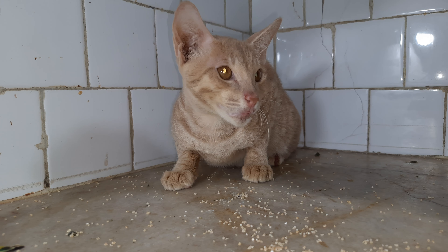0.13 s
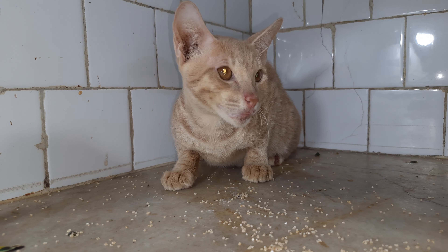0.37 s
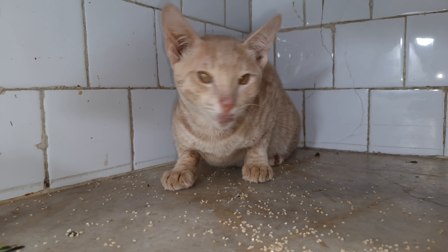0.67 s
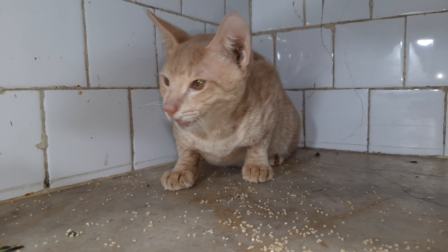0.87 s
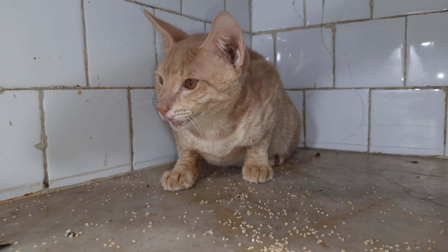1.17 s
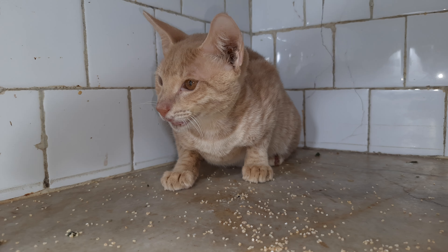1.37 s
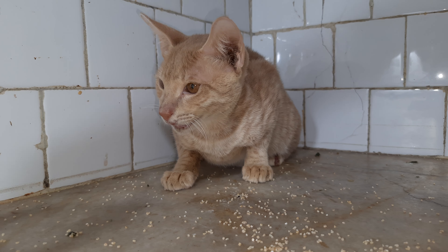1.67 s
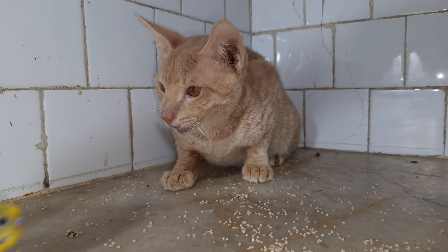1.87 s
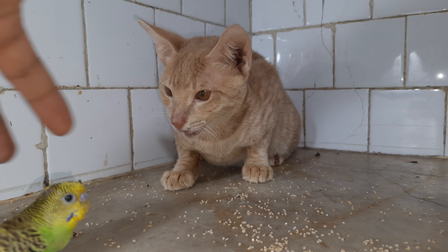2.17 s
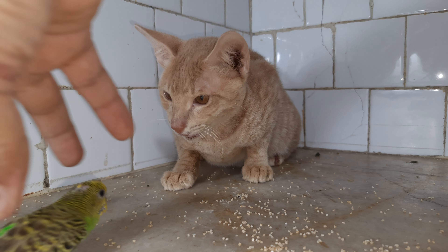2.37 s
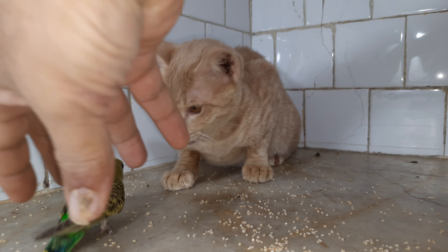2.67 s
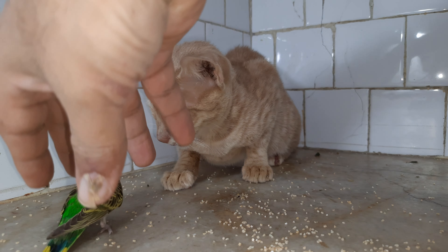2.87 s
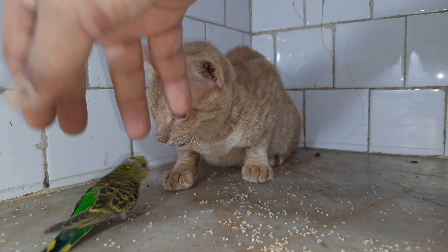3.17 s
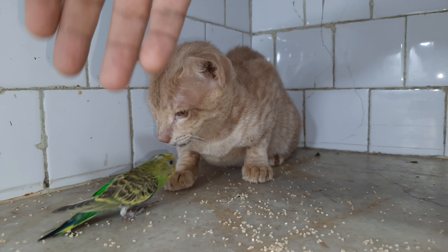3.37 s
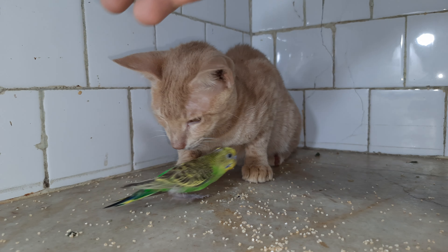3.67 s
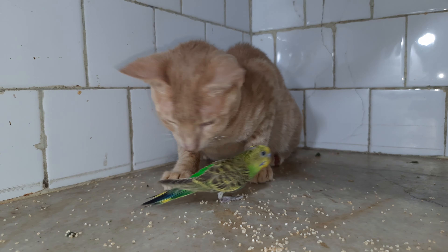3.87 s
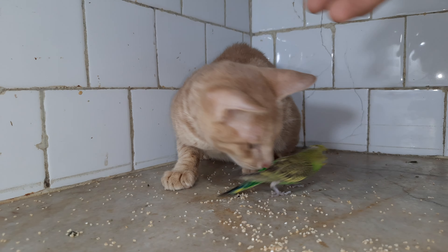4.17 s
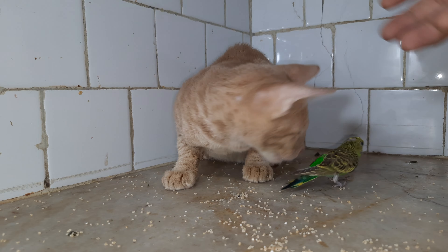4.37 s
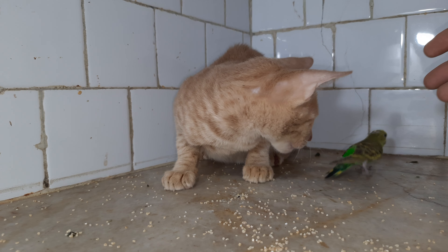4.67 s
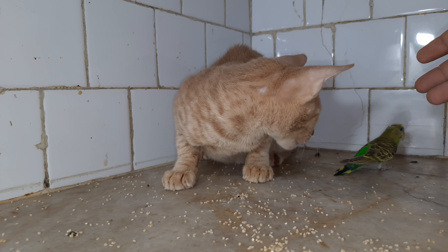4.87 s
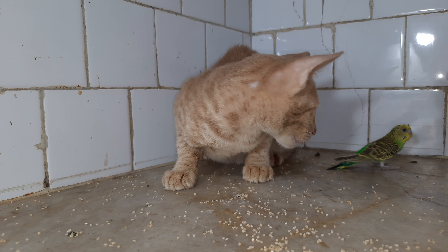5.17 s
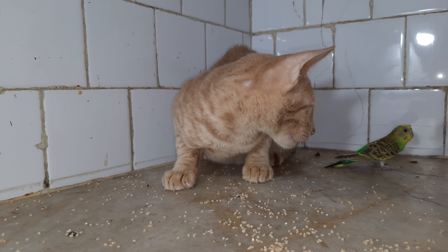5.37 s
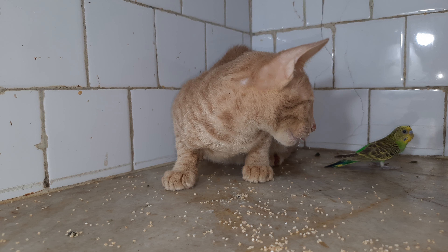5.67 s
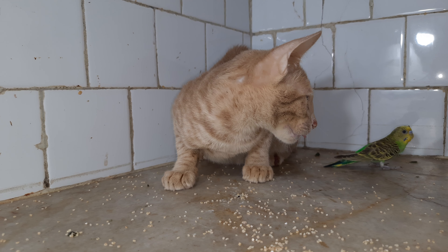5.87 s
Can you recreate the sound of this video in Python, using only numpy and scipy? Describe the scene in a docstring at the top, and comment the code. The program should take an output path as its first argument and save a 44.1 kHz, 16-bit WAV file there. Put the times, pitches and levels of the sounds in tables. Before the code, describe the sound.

Quiet tiled corner: brief feathery swishes, buffeting puffs of air and hard little knocks, then a pause and three late taps over low rumble.

```python
"""Handling close by in a tiled corner

Handling strokes and knocks close to two microphone ports: shaped noise makes swishes and rushes of air, short
cracks over ringing thuds make the knocks, and fluttering puffs of draught buffet the left port. Behind them the
room rumbles in its low modes, a far insect sings in pulses of banded noise, and a faint rustle, house noise and
a thin hiss never stop."""
import sys
import numpy as np
from scipy import signal
from scipy.fft import rfft, irfft, next_fast_len
from scipy.io import wavfile
from scipy.ndimage import uniform_filter1d, map_coordinates

SR = 44100
rng = np.random.default_rng(int(sys.argv[2]) if len(sys.argv) > 2 else 0)


def unload_wav(signal):
    """Save mono or channel-first audio to the path in sys.argv[1] as 16-bit WAV at rate SR, clipped to [-1, 1]."""
    wavfile.write(
        sys.argv[1],
        SR,
        np.round(np.clip(np.atleast_2d(signal).T, -1, 1) * 32767).astype(np.int16),
    )


N = 265349  # length [samples]

# Likeness of the two ports: (frequency [Hz], correlation [-1 to 1])
LIKENESS = [(60, 0.88), (290, 0.83), (640, 0.13), (1400, -0.17), (7000, 0.00081)]
# Decay time of the tiled walls: (frequency [Hz], t60 [s])
TILE_DECAY = [(200, 0.94), (700, 0.42), (1800, 0.51), (5000, 0.39), (13000, 0.33)]

# Hiss of the microphones: (frequency [Hz], relative gain [dB])
HISS_SPECTRUM = [(4410, -41), (7500, -6), (12500, -7), (16000, -7)]
# Far house noise: (frequency [Hz], relative gain [dB])
MURMUR_SPECTRUM = [(100, -5.5), (170, -3.5), (205, 0.5), (472, -13.5), (672, -23), (1200, -53),
                   (2640, -120)]
# Low rumble of the room: (time [s], upper modes level [dB], lowest modes level [dB])
RUMBLE_LEVELS = [(0, -52, -52), (.25, -59, -62.5), (.62, -57, -51.5), (.98, -47.5, -47.5), (1.29, -62, -73),
                 (1.46, -71, -47.5), (1.6, -68, -61), (1.68, -44, -53), (2.1, -42, -36.5),
                 (2.55, -46, -48.5), (3.0, -49.5, -52), (3.24, -44, -41), (3.32, -34, -46),
                 (3.55, -43, -49.5), (4.1, -49.5, -48), (4.3, -47.5, -51.5), (4.54, -47, -40),
                 (4.74, -52.5, -51.5), (5.04, -44, -41), (5.35, -48.5, -56.5), (5.8, -52.5, -57.5),
                 (5.93, -67.5, -62), (6.02, -54, -56)]
# Lowest room modes: (frequency [Hz], width [Hz], relative level [dB])
LOWEST_MODES = [(66.6, 8.13, -4), (81.2, 6.65, -2)]
# Upper room modes: (frequency [Hz], width [Hz], relative level [dB])
UPPER_ROOM_MODES = [(103, 4, 0), (126, 12, -11), (163, 6, -12)]

# Insect song, middle of its swells: (time [s], level [dB])
INSECT_LEVELS = [(0, -67.5), (2.4, -70), (3, -72.5), (3.6, -66), (5, -65.5), (6.02, -68)]
# Insect swells: (time [s], swells so far [count])
INSECT_SWELLS = [(-.045, -1), (1.4, 10), (3.62, 27), (6.037, 46)]
# Insect song: (frequency [Hz], relative gain [dB])
INSECT_SPECTRUM = [(4500, -120), (5600, -31), (6000, -17.5), (6250, -11.5), (6650, -9.5), (6850, -23),
                   (7100, -37), (8000, -120)]

# Faint stirring between strokes: (time [s], treble level [dB], middle level [dB], left over right [dB])
STIRRING_LEVELS = [(0, -81, -70.5, 7), (.22, -86, -74.5, 7), (.58, -77.5, -71.5, 12), (.67, -62.5, -87, 8),
                   (1.05, -53.5, -53.5, 1), (1.32, -59.5, -68, 5), (2.35, -51.5, -51.5, 3),
                   (2.75, -53, -46.5, 2), (3.05, -64.5, -59, 1.5), (3.4, -58.5, -45, 1), (3.7, -65, -54, 2),
                   (4.45, -63, -56, 1), (4.7, -68, -64, 2.1), (4.98, -63, -55.5, 2.1),
                   (5.2, -59.5, -42.5, 0.5), (6.02, -73, -68.5, 3)]
# Faint rustle: (frequency [Hz], relative gain [dB])
RUSTLE_SPECTRUM = [(880, -13.5), (1500, -7), (2400, -5), (3600, -10), (5000, -7.5), (8000, -10),
                   (10000, -13), (12500, -8), (16000, -12)]
# Treble pulses of the rustle: (time [s], pulses so far [count])
RUSTLE_PULSES = [(3.056, 0), (3.756, 13), (4.265, 22), (5.024, 35), (5.486, 43), (5.918, 50), (6.04, 52)]

# Bumps against something hollow: (time [s], peak [dB])
HOLLOW_BUMPS = [(2.606, -35.5), (2.633, -29), (2.664, -33.5), (2.698, -34.5), (2.753, -41.5)]
# Modes of the hollow thing: (frequency [Hz], mean relative level [dB], t60 [s])
HOLLOW_MODES = [(373.4, 2.5, 0.13), (434, 3, 0.19)]
# One touch on a bit of wire: (time [s], peak before panning [dB])
WIRE_TOUCH = (0.8268, -31)
# Modes of the wire: (frequency [Hz], mean relative level [dB], t60 [s])
WIRE_MODES = [(11770, 0, .09), (13000, -2, .035), (14900, -2, .025)]

# Puffs of draught: (start [s], relative level [dB], flutter [Hz], rise to the peak [s])
DRAUGHT_PUFFS = [(0.801, -27, 117, 0.0046), (0.816, -29, 54, 0.011), (0.957, -30, 288, 0.0096),
                 (1.837, -14.5, 116.3, 0.043), (1.858, -20, 92, 0.012), (1.872, -23, 414, 0.0016),
                 (1.876, -9, 228.6, 0.0089), (1.89, -13.5, 112, 0.0038), (1.917, -21, 281, 0.0098),
                 (1.995, -18.5, 95, 0.016), (2.059, -25, 86, 0.019), (2.195, -19, 220, 0.017),
                 (2.204, -20, 450, 0.0021), (2.225, -12.5, 374, 0.0014), (2.229, -9, 108, 0.0046),
                 (2.254, -16, 85, 0.02), (2.281, -12, 218.5, 0.011), (2.287, -17, 442, 0.0024),
                 (2.305, -15.5, 204, 0.00615), (2.324, -29, 70.7, 0.017), (2.442, -30.5, 132, 0.012),
                 (3.247, -31, 108, 0.0086), (5.01, -28.5, 120, 0.0075)]
# Rush of air: (frequency [Hz], relative gain [dB])
RUSH_SPECTRUM = [(40, -15.5), (110, 3), (180, 0.5), (424, -5.5), (659, -8), (1590, -20.5), (2230, -17.5),
                 (4000, -29.5), (5200, -27.5), (8800, -120)]

# Knocks, before their short delay: (time [s], relative level [dB], left over right [dB],
# relative thud level [dB], relative level of the walls [dB], tilt towards the treble [dB per octave])
KNOCK_LIST = [(0.6746, -30.5, 19.5, -11.5, -3, 0.5), (0.7721, -33, 7.5, -9, 7, -0.5),
              (0.817, -20.5, 28, -15, -11, 2.5), (0.932, -24, 9.5, -7, 4.5, -3.5),
              (0.9523, -25, -2, -3.5, -5.5, -7), (1.0107, -25, 6, -15, -16, 0),
              (1.6718, -35.5, 7, -8.5, 8.5, 1), (1.707, -27, 20, -25, 3, -5.5),
              (1.8304, -33.5, 3.5, 5.5, -1.5, 20), (1.9715, -26, 4, -13, 6, 3),
              (2.049, -28, 2, 2.5, 8.5, -13), (2.0839, -6, 6.5, -9.5, -0.5, 0.5),
              (2.1052, -17, -7, -1.5, 1.5, -3), (2.2626, -21.5, 17.5, -28, -18, 1.8),
              (2.593, -27.5, 16, -13, 3.5, -7.5), (3.259, -12.5, 1, -10.5, -2, 2.5),
              (5.02, -21.5, -3, -14, 2, 5), (5.0934, -13.5, 4, -10, -5, 0.5),
              (5.1554, -23.5, 3, -9, -26, 12)]
# Modes that a knock sets ringing: (frequency [Hz], mean relative level [dB], t60 [s])
KNOCK_MODES = [(414, 1.5, 0.046), (554.8, 1.5, 0.057)]
# Crack of a knock, before the tilt: (frequency [Hz], relative gain [dB])
CRACK_SPECTRUM = [(590, -31), (1000, -10), (2070, -0.5), (3010, -9), (5540, -5.5), (9620, -17), (14200, -9),
                  (16500, -54)]
# Thud of a knock: (frequency [Hz], relative gain [dB])
THUD_SPECTRUM = [(80, -41), (230, -4), (420, -4.5), (540, -2), (680, -8.5), (1200, -10.5), (2500, -22.5)]

# Handling strokes: (start [s], rise [s], hold [s], swish level [dB], rush of air level [dB],
# left over right in the swish [dB], sheen over the swish [dB])
HANDLING_STROKES = [(0.67, .003, 0.061, -51.5, -50.5, 13.5, 7), (0.733, 0.023, 0.0074, -45, -55, 9, 7),
                    (0.81, 0.01, 0.018, -40, -38, 1, 2.5), (0.916, 0.016, 0.048, -36.5, -39.5, 4.5, -3),
                    (1.026, 0.013, 0.0068, -49, -58, 3.5, 5.5), (1.176, 0.021, 0.014, -55.5, -58, 8, -5.5),
                    (1.386, 0.082, 0.038, -63.5, -77, 3, 13), (1.583, 0.038, 0.048, -53, -53, 2, 0),
                    (1.665, 0.0088, 0.0021, -46, -37, 4, 15), (1.704, 0.012, 0.0078, -41.5, -40.5, 2.5, 4),
                    (1.818, 0.017, 0.083, -49, -47, 0.5, 10.5), (1.849, 0.032, 0.049, -35, -34, 2.5, -6.5),
                    (1.952, 0.019, .01, -36, -32.5, 3, -11), (2.045, 0.004, 0.11, -42, -34, 7, -3),
                    (2.078, 0.014, 0.018, -33, -40, 18, -17), (2.165, 0.03, .03, -52, -42, 3, .3),
                    (2.224, 0.0073, 0.011, -43.5, -49, 4, 2.5), (2.258, 0.0097, 0.01, -40.5, -57, 1, -2.5),
                    (2.399, 0.017, 0.016, -50, -55, 3, -3.5), (2.566, 0.025, 0.0074, -39.5, -39.5, 1, -19),
                    (2.701, 0.027, 0.031, -46.5, -54, 6, -31), (2.821, 0.029, 0.05, -44.5, -70, 2.5, -4),
                    (3.25, 0.0073, 0.012, -31, -47, 1, -23), (4.316, 0.1, 0.015, -44, -52.5, 1.5, -6),
                    (5.016, 0.0061, 0.0066, -38.5, -50, 7, -4.5),
                    (5.09, 0.0079, 0.0034, -27, -40, 1, -10.5), (5.143, 0.015, .01, -42.5, -62, 2, -2)]
# Swish of a stroke: (frequency [Hz], relative gain [dB])
SWISH_SPECTRUM = [(880, -22), (1500, -5), (2340, -4), (3880, -7), (7320, -7.5), (12000, -7), (15100, -6),
                  (16000, -13)]

SWISH_TOP_HZ, TOP_HZ = 15900, 16974  # upper edge of hiss, rustle, swish and walls; of everything
PULSE_DB, PULSE_SHARP, PULSE_HZ = 2, 14, 5060  # mean peak over the rustle; narrowness; lower edge
PORT_LAG = 18  # delay of the shared part of a crack at the right port [samples]
KNOCK_DELAY_S = .0012  # short delay of every knock
SWISH_FALL_DB_PER_S, RUSH_FALL_DB_PER_S = 269, 153  # after the hold
SHEEN_HZ, SWISH_WALLS_DB = 4600, -9  # where a stroke's sheen begins; the walls' answer to the swish


def amp(db):
    """dB to gain."""
    return 10 ** (np.asarray(db) / 20)


def unit(x):
    """Scales to rms 1."""
    return x / np.sqrt(np.mean(x ** 2) + 1e-20)


def along(points, hz):
    """Reads (frequency, value) points on a log frequency axis."""
    f, v = np.transpose(points)
    return np.interp(np.log(hz + 1), np.log(f + 1), v)


def curves(rows):
    """Draws one value per sample for each column after the time."""
    s, *cols = np.transpose(rows)
    return [np.interp(np.arange(N) / SR, s, c) for c in cols]


def wobble(rate):
    """A smooth random curve with rate knots a second."""
    knots = rng.standard_normal(int(N * rate / SR) + 4)
    return map_coordinates(knots, [np.arange(N) * rate / SR])


def noise_pair(length=N):
    """Two unrelated white noises."""
    return rng.standard_normal((2, length))


def filtered(x, response):
    """Multiplies the spectrum of x by a response of frequency."""
    n = x.shape[-1]
    m = next_fast_len(n + 8192)
    return irfft(rfft(x, m) * response(np.fft.rfftfreq(m, 1 / SR)), m)[..., :n]


def colour(spectrum):
    """Gain of a spectrum table as a function of frequency."""
    return lambda hz: amp(along(spectrum, hz))


def capped(gain):
    """The same gain with nothing above the top of the swish."""
    return lambda hz: gain(hz) * (hz < SWISH_TOP_HZ)


def stereo(pair, gain):
    """Mixes two unrelated signals to the likeness of the two ports, coloured, rms 1."""
    def mid_side(hz):
        turn = np.arccos(np.clip(along(LIKENESS, hz), -1, 1)) / 2
        return gain(hz) * np.array([np.cos(turn), np.sin(turn)])

    mid, side = filtered(pair, mid_side)
    return unit(np.array([mid + side, mid - side]))


def patchy(pair, depth_db):
    """Noise of uneven colour: random gain in patches some 350 Hz by 25 ms."""
    z = signal.stft(pair, nperseg=512)[2]
    field = rng.standard_normal(z.shape[1:])
    for axis in (0, 1):
        field = uniform_filter1d(field, size=4, axis=axis)
    return signal.istft(z * amp(depth_db * unit(field)), nperseg=512)[1][:, :pair.shape[1]]


def pan(db):
    """Left and right gains for a level difference."""
    return amp(np.array([db / 2, -db / 2]))


def add(track, s, sound):
    """Mixes a sound in at a time."""
    track[:, round(s * SR):][:, :sound.shape[-1]] += sound


def ring(modes, peak_db):
    """Modes die away exponentially, at new strengths and phases for each blow."""
    t = np.arange(SR // 2) / SR
    x = np.zeros(len(t))
    for hz, db, t60 in modes:
        decay = amp(db + rng.normal(0, 2) - 60 * t / t60)
        x += decay * np.sin(2 * np.pi * (hz * t + rng.random()))
    x = x * (1 - np.exp(-t / 0.00044))  # soft onset
    return amp(peak_db) * x / np.abs(x).max()


def tail(gain):
    """A fresh answer of the tiled walls: noise in which each frequency dies at its own speed."""
    hz, t, z = signal.stft(patchy(noise_pair(SR), depth_db=2.0), SR, nperseg=256)
    decay = amp(-60 * t / along(TILE_DECAY, hz)[:, None])
    x = stereo(signal.istft(z * decay, SR, nperseg=256)[1], capped(gain))
    build_up = 1 - np.exp(-np.arange(x.shape[1]) / SR / 0.0072)
    return x * build_up / np.linalg.norm(x[0])


def strokes(levels_db, sides_db, fall_db_per_s):
    """Left and right gain of all strokes: each swells, holds and dies away; their powers add."""
    t, power = np.arange(N) / SR, np.zeros((2, N))
    for (s, rise, hold, *_), db, side_db in zip(HANDLING_STROKES, levels_db, sides_db):
        swell = np.clip((t - s) / rise, 0, 1) ** 2
        fall_db = fall_db_per_s * np.maximum(t - s - rise - hold, 0)
        power += (pan(side_db)[:, None] * swell * amp(db - fall_db)) ** 2
    return np.sqrt(power)


def hiss():
    """The microphones' own hiss: thin, steady noise in the treble."""
    return amp(-78) * stereo(noise_pair(), capped(colour(HISS_SPECTRUM)))


def house_murmur():
    """Far house noise: low coloured noise at a slowly wavering level."""
    return amp(-64.5 + 0.9 * wobble(2.57)) * stereo(noise_pair(), colour(MURMUR_SPECTRUM))


def mode_rumble(modes):
    """Room modes hum, each wandering in pitch on the scale of its width, over low noise through the same modes."""
    def response(f):
        peaks = sum((-1) ** k * amp(db) * 1j * f * width / (centre * centre - f * f + 1j * f * width)
                    for k, (centre, width, db) in enumerate(modes))
        return peaks * f ** 4 / (f ** 4 + 52 ** 4) / (1 + (f / 220) ** 4)

    noise = stereo(noise_pair(), response)
    hum = np.zeros(N)
    for centre, width, db in modes:
        level = amp(db + 2.9 * wobble(7)) * np.sqrt(width)
        cycles = np.cumsum(centre + width * wobble(6)) / SR + rng.random()
        hum += level * np.sin(2 * np.pi * cycles)
    return unit(unit(hum) + .8 * noise)


def room_rumble():
    """The upper and the lowest room modes follow separate level curves."""
    upper_db, lowest_db = curves(RUMBLE_LEVELS)
    return amp(upper_db) * mode_rumble(UPPER_ROOM_MODES) + amp(lowest_db) * mode_rumble(LOWEST_MODES)


def insect():
    """Far song: a narrow band of noise that swells in a nearly even beat."""
    beat = np.cos(2 * np.pi * curves(INSECT_SWELLS)[0])
    return amp(curves(INSECT_LEVELS)[0] + 4.4 * beat) * stereo(noise_pair(), colour(INSECT_SPECTRUM))


def stirring():
    """A faint smooth rustle; in the later part its treble pulses evenly, some 17 times a second."""
    stir_db, _, side_db = curves(STIRRING_LEVELS)
    count, = curves(RUSTLE_PULSES)
    shape = np.abs(np.cos(np.pi * count)) ** PULSE_SHARP
    pulses = (count > 0) * amp(PULSE_DB + 1.1 * wobble(10)) * shape
    gain = capped(colour(RUSTLE_SPECTRUM))
    rustle = stereo(patchy(noise_pair(), depth_db=3.5), gain)
    treble = filtered(stereo(noise_pair(), gain), lambda hz: hz ** 4 / (hz ** 4 + PULSE_HZ ** 4))
    return amp(stir_db + 0.69 * wobble(15.0)) * pan(side_db) * (rustle + pulses * treble)


def hollow_bumps():
    """Bumps set two low modes of something hollow ringing, alike at both ports."""
    out = np.zeros((2, N + SR))
    for s, db in HOLLOW_BUMPS:
        add(out, s, ring(HOLLOW_MODES, db)[None])
    return out[:, :N]


def wire_tink():
    """A bit of wire is touched and rings high, far to the left."""
    out = np.zeros((2, N + SR))
    s, db = WIRE_TOUCH
    add(out, s, ring(WIRE_MODES, db) * pan(31)[:, None])
    return out[:, :N]


def draught():
    """Each puff sets the air in the left port fluttering amid turbulence; the right port hears little of it."""
    out, t = np.zeros((2, N + SR)), np.arange(SR // 4) / SR
    for s, db, hz, rise in DRAUGHT_PUFFS:
        u = t / rise
        flutter = np.sin(2 * np.pi * hz * t)
        eddies = unit(filtered(rng.standard_normal(len(t)), lambda f: 1 / (1 + (f / 380) ** 3)))
        turbulence = 0.4 * eddies * u * np.exp(1 - u)
        puff = (flutter + turbulence) * u ** 2 * np.exp(2 - 2 * u)
        add(out, s, puff / np.abs(puff).max() * amp([[db + 5.0], [db - 36]]))
    return filtered(out[:, :N], lambda f: f ** 3 / (f ** 3 + 42 ** 3))


def air_rush():
    """Air rushes with the strokes and the stirring: lumpy noise, strongest in the low mids, a little to the left."""
    lumps = amp(.6 * wobble(30) + .9 * wobble(90))
    rush_db = np.transpose(HANDLING_STROKES)[4]
    stroke_gain = strokes(rush_db, 0 * rush_db, RUSH_FALL_DB_PER_S)
    gain = np.hypot(stroke_gain, amp(curves(STIRRING_LEVELS)[1]))
    noise = stereo(lumps * patchy(noise_pair(), depth_db=2.5), colour(RUSH_SPECTRUM))
    return gain * pan(2.3)[:, None] * noise


def knocks():
    """A short crack with a quick rebound over a duller, briefly ringing thud, each with its own wall answer."""
    out, t = np.zeros((2, N + 2 * SR)), np.arange(SR // 20) / SR
    for s, db, side_db, thud_db, walls_db, tilt_db in KNOCK_LIST:
        s = s + KNOCK_DELAY_S
        rebound = rng.uniform(.001, .002)
        strike = amp(-60 * t / .004) + .45 * (t > rebound) * amp(-60 * np.abs(t - rebound) / .008)
        near, apart = rng.standard_normal(len(t)), noise_pair(len(t))
        near[0] = 5  # the blow itself, before its scatter
        blow = near * strike
        burst = np.array([blow, np.pad(blow, (PORT_LAG, 0))[:len(t)]])
        tone = lambda hz: colour(CRACK_SPECTRUM)(hz) * amp(tilt_db * np.log2((hz + 100) / 4000))
        crack = filtered(burst + .5 * apart * strike, tone)
        crack = crack / np.abs(crack).max()
        thud = stereo(patchy(noise_pair(len(t)), depth_db=1), colour(THUD_SPECTRUM))
        thud = thud * amp(-60 * t / 0.033 + thud_db - 4.5)
        thud = thud + ring(KNOCK_MODES, thud_db - 5.5)[:len(t)]
        add(out, s, amp(db + 2.0) * (crack + thud) * pan(side_db)[:, None])
        crack_walls = np.linalg.norm(crack[0]) * tail(tone)
        thud_walls = np.linalg.norm(thud[0]) * tail(colour(THUD_SPECTRUM))
        walls_gain = amp(db + 5.0 + walls_db) * pan(0.33 * side_db)[:, None]
        add(out, s, walls_gain * (crack_walls + thud_walls))
    return out[:, :N]


def swishes():
    """Strokes swish in uneven flicks and fine ticks of noise; both ports hear the same flicks, then the walls."""
    swish_db, _, side_db, sheen_db = np.transpose(HANDLING_STROKES)[3:]
    flicks = amp(0.73 * wobble(60) + 2.1 * wobble(200))
    tick_starts = (rng.random(N) < 140 / SR) * amp(5 * rng.exponential(size=N))  # some 140 a second
    ticks = np.convolve(tick_starts, amp(-60 * np.arange(SR // 100) / SR / .006))[:N]
    noise = (flicks + 0.35 * np.minimum(ticks, 3)) * patchy(noise_pair(), depth_db=2)
    noise = stereo(noise, capped(colour(SWISH_SPECTRUM)))
    sheen = filtered(noise, lambda hz: hz ** 2 / (hz ** 2 + SHEEN_HZ ** 2))
    body_gain = strokes(swish_db, side_db, SWISH_FALL_DB_PER_S)
    sheen_gain = strokes(swish_db + sheen_db, side_db, SWISH_FALL_DB_PER_S)
    swish = body_gain * (noise - sheen) + sheen_gain * sheen
    walls = signal.fftconvolve(swish, tail(np.ones_like), axes=1)[:, :N]
    return swish + amp(SWISH_WALLS_DB) * walls


def scene():
    """All sources at the two ports, from the background to the handling."""
    background = hiss() + house_murmur() + room_rumble() + insect() + stirring()
    touches = hollow_bumps() + wire_tink()
    return background + touches + draught() + air_rush() + knocks() + swishes()


def record(dry):
    """The loudest peaks bend softly; nothing above the band limit passes."""
    bent = dry / (1 + np.abs(dry / .93) ** 6) ** (1 / 6)
    return filtered(bent, lambda hz: hz < TOP_HZ)


dry = scene()
out = record(dry)
unload_wav(out)
```